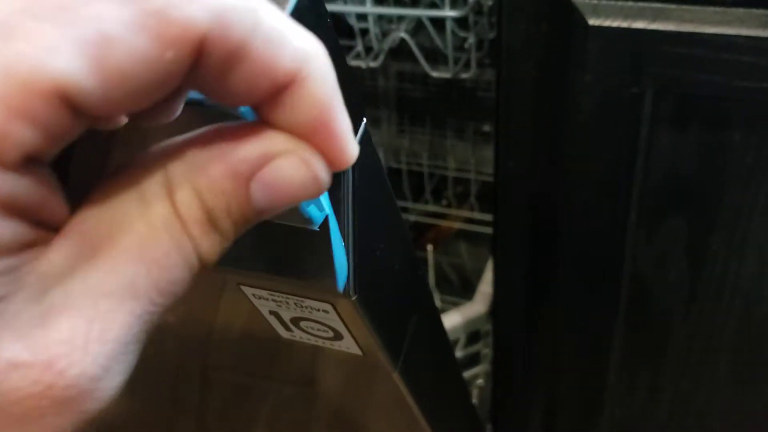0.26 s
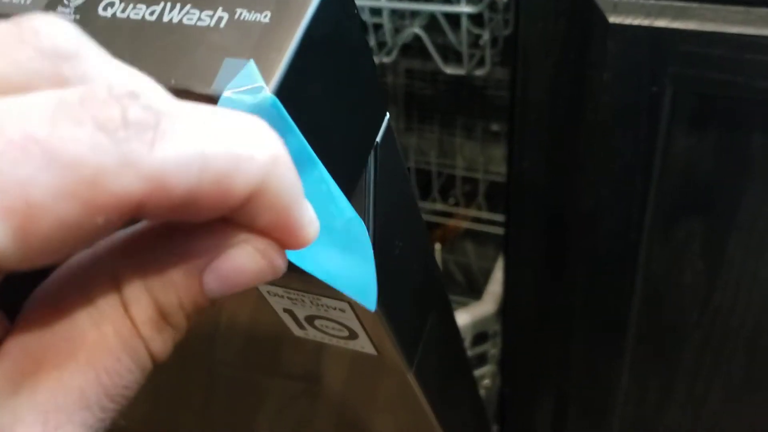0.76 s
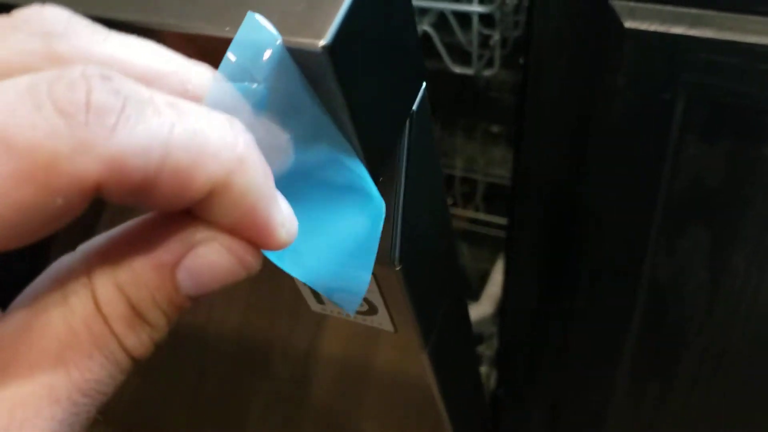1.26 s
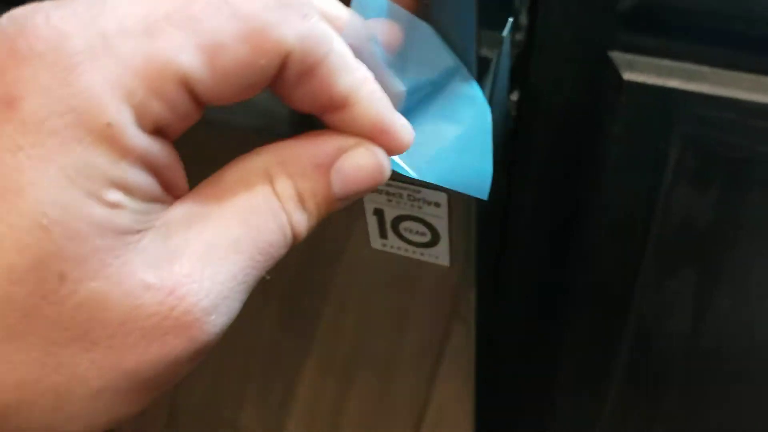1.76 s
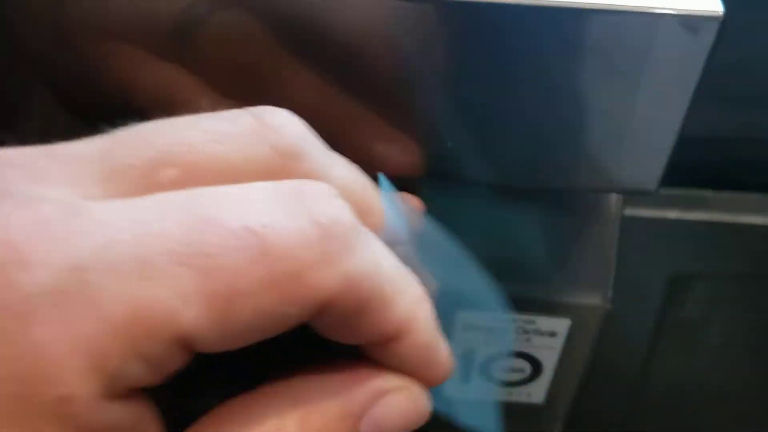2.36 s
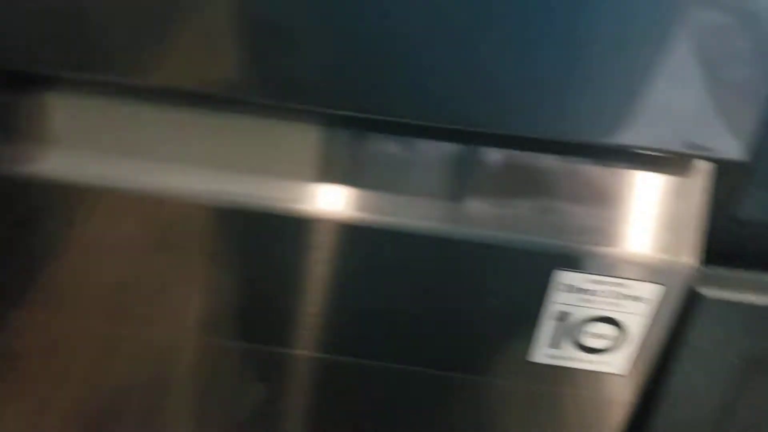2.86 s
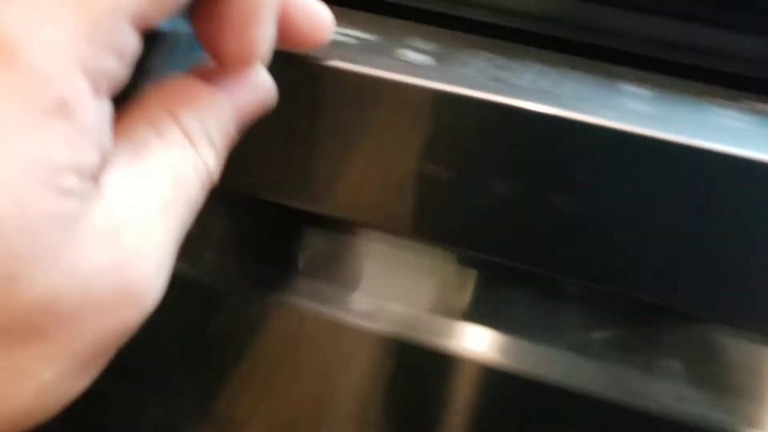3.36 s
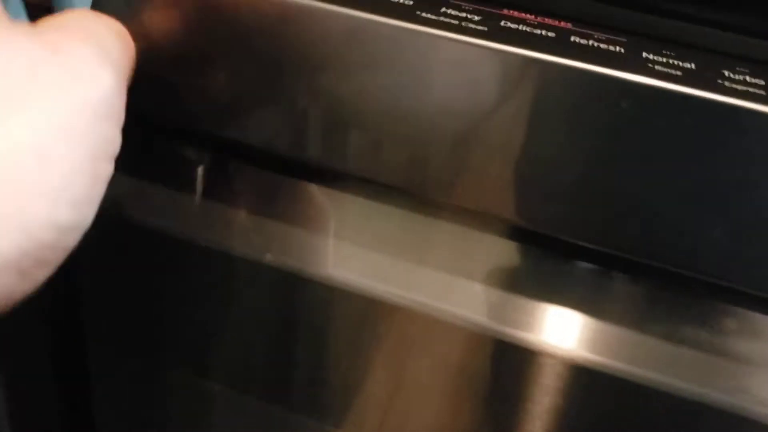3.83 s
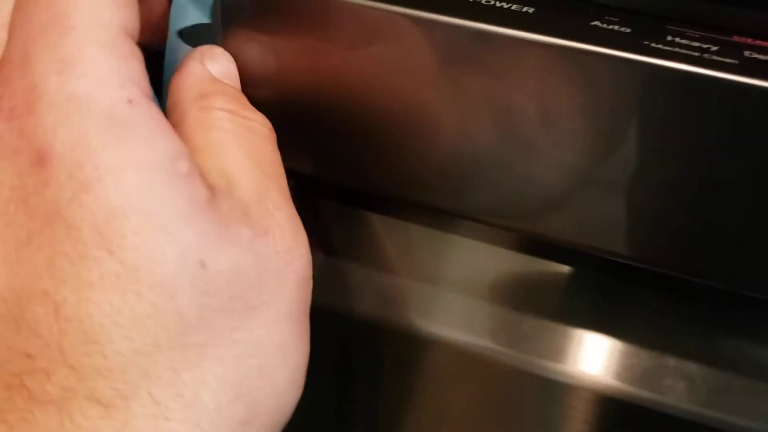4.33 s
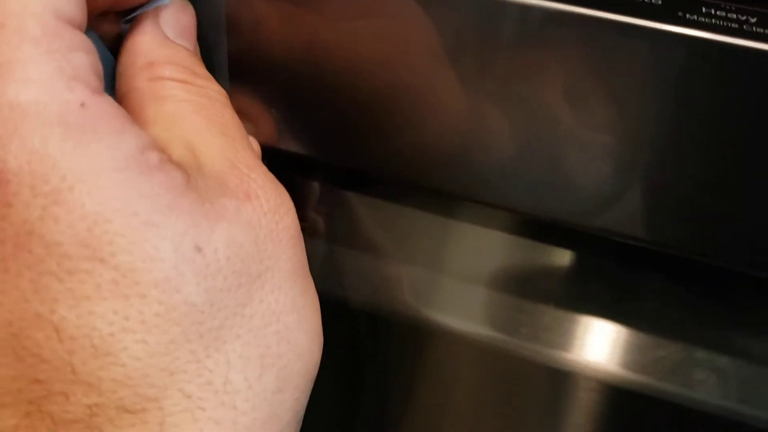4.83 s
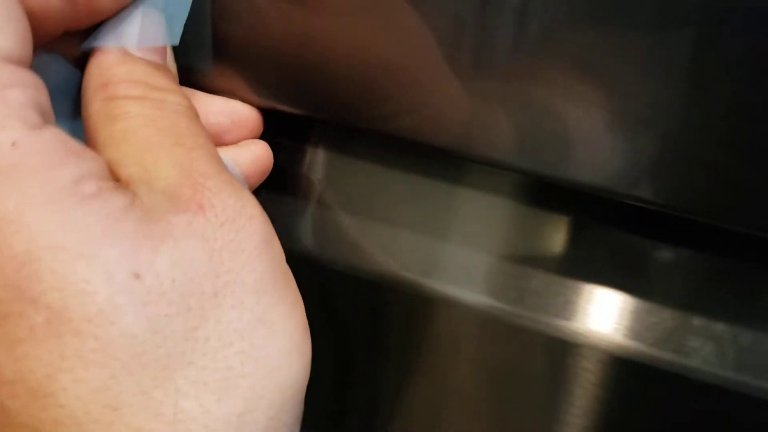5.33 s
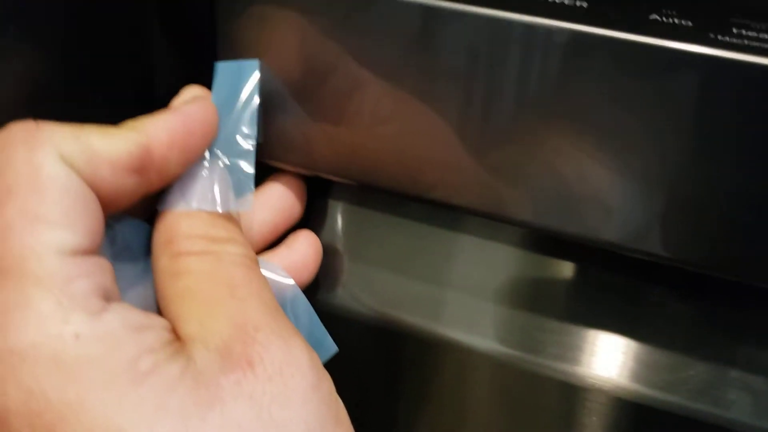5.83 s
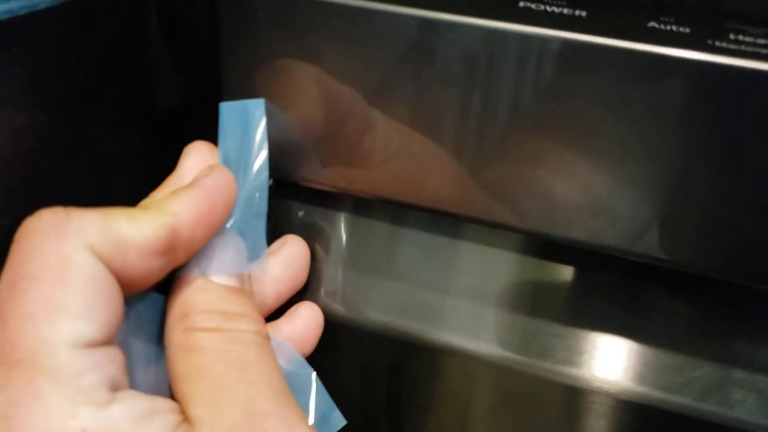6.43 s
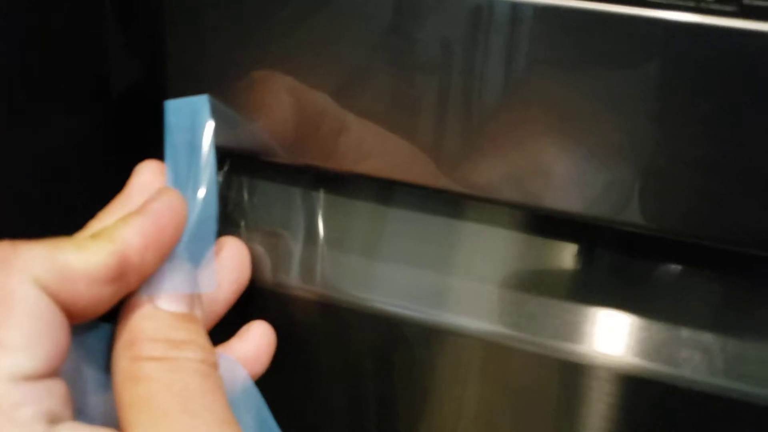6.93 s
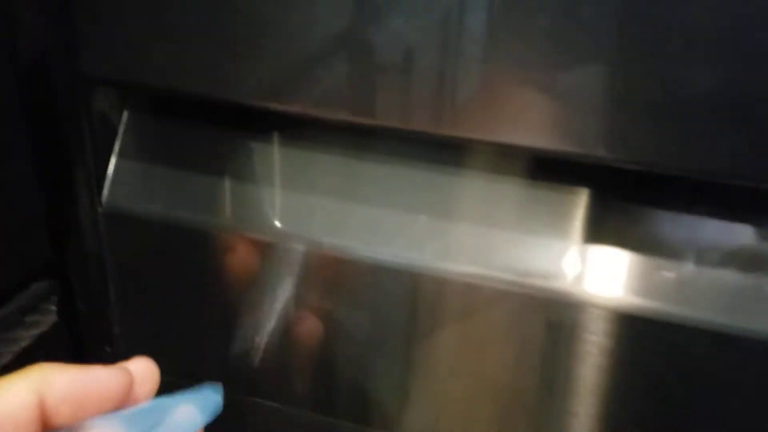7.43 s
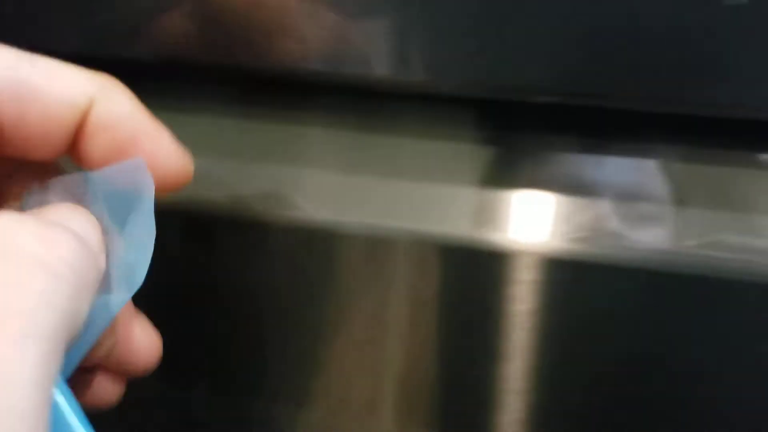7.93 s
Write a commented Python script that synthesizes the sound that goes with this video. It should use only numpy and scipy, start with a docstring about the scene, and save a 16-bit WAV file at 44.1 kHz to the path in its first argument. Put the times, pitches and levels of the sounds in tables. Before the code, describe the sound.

Protective plastic film is peeled by hand off a steel dishwasher door, very close to the microphone. Short tugs give sharp snaps and sticky crackles, with a couple of low air thumps early on. Scattered ticks lead to a busier run of snapping, a lull, then a longer crackling pull and a final burst of crinkling. The kitchen adds a short, bright echo and a faint hum.

```python
"""Peeling film off a steel door

Protective film is pulled off a dishwasher door by hand, a few centimetres from a phone.
Creases buckle with sharp snaps, the glue lets go in crackling runs and the door rings faintly under both.
The flicking film slaps and puffs air at the phone; a humming kitchen adds a short, bright echo."""
import sys
import numpy as np
from scipy import signal
from scipy.fft import rfft, irfft
from scipy.io import wavfile
from scipy.ndimage import uniform_filter1d

SR = 44100
rng = np.random.default_rng(int(sys.argv[2]) if len(sys.argv) > 2 else 0)


def persist_wave(psi):
    """Save psi, clipped to +-1, as 16-bit WAV."""
    counts = np.round(np.clip(psi, -1, 1) * 32767).astype(np.int16)
    wavfile.write(sys.argv[1], SR, np.atleast_2d(counts).T)


N = 361179
TIME = np.arange(N) / SR
SNAP_LEAD_S = .01  # a snap starts this long before its peak


# Creases in the loose film giving way: t/s, ring level/dB, ring f/Hz, crack level/dB
CREASES = [(0.2158, -59, 4500, -33), (0.4887, -46.5, 3500, -66), (0.51, -62, 3360, -43.5),
           (0.773, -58, 1710, -46.5), (0.8962, -48.5, 6500, -19), (1.202, -39.5, 5850, -37),
           (1.269, -75, 3700, -53), (2.066, -47, 4190, -49), (2.2096, -26.5, 4800, -30),
           (3.118, -47.5, 2920, -70.5), (3.3153, -41, 2760, -31.5), (3.4799, -55, 5700, -29),
           (3.5116, -22.5, 3740, -18.5), (3.543, -51, 4780, -28), (3.747, -44.5, 2060, -25),
           (3.817, -36.5, 4600, -36.5), (4.0392, -44.5, 5300, -46.5), (4.1099, -17.5, 5070, -55),
           (4.265, -42.5, 4400, -57.5), (4.361, -44, 4600, -52), (4.404, -32, 4300, -30),
           (4.6342, -42, 3830, -35), (4.7177, -36, 3900, -41), (4.7588, -37, 3930, -28),
           (4.779, -26.5, 3800, -30), (4.849, -31.5, 5120, -28.5), (4.9126, -48, 5750, -19),
           (5.3236, -51, 3790, -41), (5.54, -40, 3930, -42), (5.6007, -45.5, 5910, -41),
           (5.919, -58.5, 4460, -46.5), (6.2807, -49.5, 5540, -47), (6.355, -83, 4550, -46.5),
           (6.4947, -30.5, 2720, -23.5), (6.709, -34, 4830, -31), (7.1266, -25, 4370, -18),
           (7.148, -30.5, 4100, -36), (7.2035, -29, 6040, -22), (7.5087, -51.5, 6070, -27),
           (7.5416, -34, 3820, -26), (7.6442, -39, 5640, -51), (7.6755, -35, 5140, -47),
           (7.7846, -34.5, 3740, -31.5), (7.9079, -59, 5470, -47), (7.9948, -33.5, 4270, -42),
           (8.0099, -39, 1373, -23), (8.025, -24, 5500, -26), (8.0359, -31, 5500, -19),
           (8.044, -22.5, 3680, -19), (8.056, -18.5, 3620, -30), (8.0678, -25.5, 2010, -25),
           (8.08, -28.5, 2030, -19.5), (8.1125, -31, 1920, -20.5), (8.1341, -24, 4300, -19.5),
           (8.157, -40.5, 1910, -26), (8.175, -52, 5820, -31.5)]

def creases():
    """Each crease buckles with a very short snap that barely moves the door."""
    events = [(s, ring_db, hz, crack_db, max(ring_db, crack_db) - 36, .87)
              for s, ring_db, hz, crack_db in CREASES]
    return place_snaps(events, pan_db=-14, room_db=-13)


# Patches of glue tearing off the door: t/s, ring level/dB, ring f/Hz, crack level/dB, length/ms
RIPS = [(0.186, -64, 5500, -23, 0.98), (0.605, -44, 4250, -33.5, 0.16), (0.609, -46, 2000, -35.5, 7.5),
        (0.6295, -44, 2290, -38, 0.43), (0.8406, -33, 4200, -29, 3.5), (0.8712, -35.5, 2800, -22, 1),
        (1.008, -37, 5900, -19, 0.69), (1.016, -37, 4660, -21.5, 1.7), (1.023, -36, 3500, -21, 0.31),
        (1.0293, -20.5, 3720, -25, 36), (1.586, -49, 1300, -45.5, 5.2), (2.126, -49.5, 1510, -35.5, 0.9),
        (2.1932, -35.5, 3300, -24, 0.25), (2.36, -47.5, 2100, -60, 27), (2.765, -45.5, 3164, -64, 25),
        (3.2823, -42, 2826, -37, 4.4), (3.378, -34.5, 2900, -26.5, 0.53), (3.492, -34, 3720, -30.5, 5.3),
        (3.8391, -50, 3100, -32.5, 3.9), (3.8579, -40, 3950, -32.5, 0.55), (3.87, -38, 3800, -35.5, 9.7),
        (4.1414, -18.5, 5120, -25, 9.5), (4.3372, -34.5, 4600, -46, 0.3), (4.407, -20, 5270, -32, 1.35),
        (4.4851, -33, 5300, -26.5, 1.8), (4.5323, -58, 5750, -23.5, 0.52), (4.585, -33.5, 2950, -26.5, 11),
        (4.775, -31, 3930, -25.5, 0.45), (5.682, -29, 2700, -20.5, 1.06), (6.246, -39, 2880, -42, 4.9),
        (6.841, -44, 3290, -31.5, 0.2), (7.2091, -49, 3580, -17, 1.3), (7.2435, -30, 3440, -42, 0.42),
        (7.2606, -28.5, 1300, -22, 0.32), (7.2654, -25.5, 2760, -27.5, 7.6),
        (7.3294, -39.5, 2820, -42.5, .5), (7.3741, -39, 7180, -30, 0.96), (7.413, -39.5, 1690, -29, 0.89),
        (7.449, -34.5, 3420, -27.5, 5.5), (7.464, -48, 3700, -31.5, 0.36), (7.5868, -49, 2060, -31.5, 0.42),
        (7.7012, -34, 2180, -21, 3.5), (7.728, -24, 2520, -15.5, 10.5)]

def rips():
    """Each rip also taps the door. Steel yields little, so the tap grows more slowly than the rip."""
    events = [(s, ring_db, hz, crack_db, -32.5 + .57 * max(ring_db, crack_db), ms)
              for s, ring_db, hz, crack_db, ms in RIPS]
    return place_snaps(events, pan_db=-13, room_db=-12.5)


# Tone of a crack, mostly treble: f/Hz, level/dB
CRACK_TONE = [(200, -20.5), (900, -30.5), (2000, -14), (3500, -3.5), (5300, -0.5), (8500, -9.5),
              (10500, -10.5), (12500, -1), (15500, -5), (17000, -19)]

def snap(ring_db, ring_hz, crack_db, door_db, ms):
    """A burst of tiny breaks makes three stereo sounds: the film's ring, a crack and a tap on the door."""
    t = np.arange(int(.08 * SR)) / SR
    age_ms = 1000 * (t - SNAP_LEAD_S)
    # a long rip builds up as the glue stretches, then lets go
    burst = np.exp(np.minimum(age_ms / (.5 * ms), -age_ms / (.7 * ms ** .7)))
    # hand and door throw the burst back within a few milliseconds
    rebound = .43 * np.exp(-np.abs(age_ms) / 4.04) * (age_ms > 0)
    breaks = grains(len(t), per_s=20000, spread_db=1) * burst
    direct = np.array([breaks, np.roll(breaks, 8)])  # the right microphone hears it 8 samples later
    bounced = grains((2, len(t)), per_s=5000, spread_db=.53) * rebound
    push = direct + bounced
    ring = resonate(resonate(push, ring_hz, .32 * ring_hz), ring_hz, .7 * ring_hz)
    crack = colour(direct + .5 * bounced, CRACK_TONE)  # skin soaks up treble, so less comes back
    door = steel_door(push) + .15 * resonate(push, 1400, 870)
    parts = (ring_db, ring), (crack_db, crack), (door_db, door)
    # set each level as if all the energy fell within 10 ms
    return [undb(db) * x / np.sqrt(np.sum(x ** 2, axis=1, keepdims=True) / (SR / 100)) for db, x in parts]


# The left microphone faces away from the film and favours middle pitches: f/Hz, level/dB
LEFT_MIC_TONE = [(200, 10), (900, 10.5), (2000, 10.5), (4800, -3), (8000, -2), (15000, 6.5)]

def place_snaps(events, pan_db, room_db):
    """Snaps as heard at the phone and as sent into the room; pan_db turns the left side down."""
    near, sent = np.zeros((2, N)), np.zeros(N)
    for s, ring_db, ring_hz, crack_db, door_db, ms in events:
        ring, crack, door = snap(ring_db, ring_hz, crack_db, door_db, ms)
        left_db = pan_db + 5 * rng.standard_normal()  # each bit of film faces its own way
        add(near, (ring + crack + door) * sides(left_db, 0), s - SNAP_LEAD_S)
        # the ring of a small bit of film carries less far than the crack
        add(sent, (.5 * ring + crack + door)[1] * undb(room_db), s - SNAP_LEAD_S)
    return np.array([colour(near[0], LEFT_MIC_TONE), near[1]]), sent


# Tone of the crackling glue, also used for the sliding film: f/Hz, level/dB
CRACKLE_TONE = [(200, -7.5), (900, -17), (1900, -1.5), (2900, -5.5), (5200, -1.5), (8500, -13),
                (10500, -7.5), (12600, -1.5), (16000, -9)]

def peeling():
    """Threads of glue part in dense, uneven showers and drum on the door; the film adds sparse ticks."""
    glue_strength, door_strength = pull()
    slip_db = 2.9 * wobble(per_s=170) + 2.3 * wobble(per_s=35)  # the edge sticks and slips
    threads = grains((2, N), per_s=2300, spread_db=3) * undb(slip_db)
    flutter = rng.standard_normal((2, 300)) * np.exp(-TIME[:300] / .0009)
    clicks = grains((1, N), per_s=90, spread_db=2.2)
    ticks = unit(signal.oaconvolve(clicks, flutter, axes=1)[:, :N])
    crackle = unit(colour(threads + .65 * ticks, CRACKLE_TONE))
    drumming = unit(steel_door(threads + .21 * threads[::-1]))
    return crackle * glue_strength * sides(-1, 4) + drumming * door_strength * undb(-7)


# The last long pull that takes the strip off: t/s, crackle level/dB, door level/dB
LONG_PULL = [(6.89, -79.5, -80), (6.92, -55, -53.5), (7.11, -57.5, -66), (7.135, -44.5, -41.5),
             (7.2, -48, -56), (7.215, -34.5, -30.5), (7.28, -39, -29), (7.34, -45.5, -50.5),
             (7.44, -42, -37.5), (7.58, -38, -42.5), (7.68, -43, -48), (7.73, -47, -49.5),
             (7.98, -78, -58.5)]
# Short tugs that each peel a little film: t/s, length/s, crackle level/dB
TUGS = [(0, .06, -50), (0.197, .08, -34.5), (0.527, .1, -63.5), (0.799, 0.17, -55.5), (1.02, .15, -39.5),
        (1.429, .35, -60), (2.193, .1, -55), (2.307, .22, -55), (2.691, 0.086, -61), (3.479, .17, -52),
        (3.702, 0.18, -50.5), (4.537, .11, -41.5), (4.755, .17, -52), (5.668, .14, -48)]

def pull():
    """How strongly the hand's pull makes the glue crackle and the door drum, moment by moment."""
    glue, door = (undb(db) * gate(LONG_PULL) for db in curves(LONG_PULL))
    for s, length_s, db in TUGS:
        shape = tug(length_s, db)
        add(glue, undb(db) * shape, s)
        add(door, undb(-6 + .81 * db) * shape, s)
    return glue, door


def tug(length_s, db, slack_db=-73, let_go_s=.032):
    """A tug takes hold quickly and slackens: the harder it starts, the further it sinks."""
    t = TIME[:SR]
    taking_hold = 1 - np.exp(-t / (.034 * length_s))
    sinking = undb(-.7 * max(db - slack_db, 0) * t / length_s)
    letting_go = np.exp(-np.maximum(t - length_s, 0) / let_go_s)
    return taking_hold * sinking * letting_go


# The pitches at which the steel door rings: f/Hz, width/Hz, level/dB
DOOR_RINGS = [(202, 41, -5.5), (292, 33, 2.5), (413, 370, -9), (606, 26, 2.5), (867, 100, -3.5),
              (970, 15, 5), (1081, 210, -1.5), (1395, 150, -0.5), (1652, 27, 0.5)]

def steel_door(push):
    """Pushed by the film, the door rings at all its own pitches at once."""
    return sum((-1) ** k * undb(db) * resonate(push, hz, width)
               for k, (hz, width, db) in enumerate(DOOR_RINGS))


# Puffs of air as the tight film gives way: t/s, level/dB, fade time/ms
PUFFS = [(0.1859, -9.5, 13.8), (0.8724, -8, 6.5), (1.023, -31, 14), (3.747, -43, 31), (4.531, -24, 7.3),
         (4.771, -29.5, 6), (4.915, -26, 6.3), (8.024, -31, 12)]

def puffs(hz=64):
    """Each puff swings the nearer microphone through a couple of slow cycles: a low thump."""
    out, t = np.zeros(N), TIME[:SR // 4]
    swing = -np.cos(2 * np.pi * hz * t + .89)
    for s, db, ms in PUFFS:
        add(out, undb(db) * swing * np.exp(-t * 1000 / ms) * (1 - np.exp(-t / .000063)), s)
    return out * sides(-15, 0)


# The tight film flicking free: t/s, level/dB
FLICKS = [(0, -42), (0.189, -28.5), (0.872, -31.5), (1.014, -23.5), (3.49, -32), (4.777, -40)]
# Tone that turns a snap into a slap: f/Hz, level/dB
SLAP_TONE = [(1000, 6.5), (3200, -5.5), (5000, -3), (9000, 6.5), (13000, 8)]

def flicks():
    """The whole sheet throws each slap away from the phone, so it arrives by way of the room."""
    out = np.zeros(N)
    for s, db in FLICKS:
        ring, crack, _ = snap(db + .5, ring_hz=5200, crack_db=db, door_db=db, ms=9)
        add(out, (ring + crack)[1], s - SNAP_LEAD_S)
    return colour(out, SLAP_TONE)


def rustle():
    """Film sliding on film has no glue to catch on: a fine, smooth hiss that leaves the door still."""
    sway = undb(2 * wobble(per_s=25))  # swells and eases with the hand
    hiss = unit(colour(grains((2, N), per_s=9900, spread_db=2.4), CRACKLE_TONE))
    return hiss * sweep() * sway * sides(-1, 3)


# The freed film sweeping over itself: t/s, length/s, level/dB
SWEEPS = [(1.251, 0.23, -56.5), (1.411, 0.42, -56), (2.867, .38, -60.5), (3.262, .3, -50.5),
          (5.078, .4, -70.5), (5.931, .34, -57), (6.911, 0.19, -48.5), (7.987, 0.39, -33)]

def sweep():
    """How strongly the freed film slides over itself, moment by moment."""
    out = np.zeros(N)
    for s, length_s, db in SWEEPS:
        add(out, undb(db) * tug(length_s, db), s)
    return out


def loose_film(count=120, spread_db=13.5):
    """Small creases tick while the film moves, more often and louder the harder it is pulled."""
    out = np.zeros((2, N))
    motion = pull()[0] + sweep() + undb(-72.5)
    odds = np.cumsum(motion ** .4)
    for when, size, pitch in rng.random((count, 3)):
        at = np.searchsorted(odds, when * odds[-1])
        motion_db = 20 * np.log10(motion[at])
        db = -21.5 + .71 * motion_db + spread_db * size ** 2
        tick = sum(snap(db, ring_hz=2600 * 2 ** pitch, crack_db=db, door_db=db - 20.5, ms=1))
        add(out, tick, at / SR)
    return out * sides(-8, 0)


# Fingers bumping and sliding on the door: t/s, f/Hz, level/dB, fade time/ms
FINGER_BUMPS = [(0.534, 266, -56, 45), (0.635, 157, -48.5, 31), (.662, 237, -50, 21),
                (0.771, 363, -43.5, 11.4), (0.789, 96, -47, 96), (1.053, 260, -47, 67),
                (3.717, 153, -55, 110), (4.14, 213, -54.5, 74), (4.329, 137.6, -55.5, 100),
                (4.551, 195, -56.5, 140), (7.255, 286, -52, 37)]

def fingers():
    """Soft skin on steel: dull, short bursts of rubbing."""
    out, t = np.zeros(N), TIME[:SR // 3]
    for s, hz, db, ms in FINGER_BUMPS:
        noise = rng.standard_normal(len(t))
        rub = unit(resonate(resonate(noise, hz, 2 * hz), hz, 1.9 * hz))
        add(out, undb(db) * rub * np.exp(-t * 1000 / ms) * (1 - np.exp(-t / .005)), s)
    return out * sides(-1.5, 4.5)


# The path of one thin squeak: t/s, f/Hz, level/dB
SQUEAK = [(2.64, 1087, -87), (2.764, 1110, -76.5), (2.796, 1180, -73), (2.862, 1144, -74), (2.9, 1098, -89)]

def squeak():
    """A faint, nearly pure squeak that rises and falls."""
    hz, db = curves(SQUEAK)
    waver = 1 + .0053 * wobble(per_s=100)
    tone = unit(np.sin(2 * np.pi * np.cumsum(hz * waver) / SR))
    return tone * undb(db) * gate(SQUEAK) * sides(1, 3)


# Tone of the kitchen's echo: f/Hz, level/dB
ECHO_TONE = [(150, -21.5), (1200, 10), (2800, 6.5), (4500, -1.5), (8500, -3.5), (12000, -0.5), (16000, -7)]

def kitchen_echo(sound, near_s=.22, far_s=.7, far_db=-18):
    """Hard cabinets close by give a dense, bright echo; the rest of the room a fainter, longer one."""
    t = TIME[:SR * 3 // 4]
    fade = undb(-60 * t / near_s) + undb(far_db - 60 * t / far_s)
    onset = 1 - np.exp(-t / .00056)
    tail = colour(rng.standard_normal((2, len(t))) * fade * onset, ECHO_TONE)
    tail /= np.sqrt(np.sum(tail ** 2) / 2)
    return signal.oaconvolve(sound[None], tail, axes=1)[:, :N] * sides(-6, 0)


# How the kitchen's hum swells and fades: t/s, low note level/dB, base level of the upper notes/dB
HUM_LEVELS = [(0, -63.5, -117), (1.5, -65.5, -75.5), (3.2, -64.5, -78), (3.6, -56.5, -68.5),
              (7, -60.5, -70), (7.5, -64.5, -67.5), (8.19, -72.5, -74)]
# Tone of the kitchen's rumble: f/Hz, level/dB
RUMBLE_TONE = [(20, -28), (42, -10.5), (70, 2), (120, -9), (230, -7), (490, -15.5), (1000, -35.5),
               (3000, -47.5)]
# Tone of the faint hiss: f/Hz, level/dB
HISS_TONE = [(300, -15.5), (1070, -2.5), (1400, -11), (2290, 7.5), (3000, -16), (5200, -2.5), (8300, -27.5),
             (12000, -13.5), (16000, -20.5)]

def background():
    """Both microphones hear a low hum and rumble, and each has a faint hiss of its own."""
    low_db, high_db = curves(HUM_LEVELS)
    drifting_time = TIME + .0079 * np.cumsum(wobble(per_s=5)) / SR
    # a motor runs just under twice the mains frequency, so the two upper notes throb together
    notes = (53.8, low_db), (118.2, high_db + 4), (122, high_db - 15.5)
    hum = sum(undb(db) * unit(np.sin(2 * np.pi * hz * drifting_time)) for hz, db in notes)
    noise = rng.standard_normal(N) + .36 * rng.standard_normal((2, N))
    rumble = unit(colour(noise, RUMBLE_TONE)) * undb(-64.5 + .45 * (low_db + 61))
    hiss = unit(colour(rng.standard_normal((2, N)), HISS_TONE))
    return (hum + rumble) * sides(-1, 1) + hiss * sides(-71, -67)


def undb(db):
    """Turn decibels into a number to multiply by."""
    return 10 ** (np.asarray(db) / 20)


def sides(left_db, right_db):
    """Turn the left and right sides up or down."""
    return undb([[left_db], [right_db]])


def unit(x):
    """Scale a signal to an average strength (rms) of 1."""
    return x / np.sqrt(np.mean(x ** 2) + 1e-18)


def wobble(per_s):
    """A random wander that changes about per_s times a second."""
    return unit(uniform_filter1d(rng.standard_normal(N), SR // per_s))


def grains(shape, per_s, spread_db):
    """Tiny clicks at random moments, mostly weak and a few strong."""
    sizes = undb(spread_db * np.minimum(rng.exponential(size=shape), 4))
    return unit(rng.standard_normal(shape) * sizes * (rng.random(shape) < per_s / SR))


def curves(table):
    """The columns of a table, joined by straight lines in time."""
    s, *columns = np.transpose(table)
    return [np.interp(TIME, s, c) for c in columns]


def gate(table):
    """1 between a table's first and last time, 0 outside, with soft edges."""
    return uniform_filter1d(1. * ((TIME > table[0][0]) & (TIME < table[-1][0])), SR // 100)


def colour(x, points, size=2048):
    """Shape the tone of a sound along (f/Hz, level/dB) points."""
    hz, db = np.transpose(points)
    gain = undb(np.interp(np.log(np.arange(size // 2 + 1) * SR / size + 1), np.log(hz), db))
    # this fold makes the filter ring only after a click, never before it
    cepstrum = irfft(np.log(gain))
    cepstrum[1:size // 2] *= 2
    cepstrum[size // 2 + 1:] = 0
    response = irfft(np.exp(rfft(cepstrum)))
    return np.apply_along_axis(signal.oaconvolve, -1, x, response)[..., :x.shape[-1]]


def resonate(x, hz, width_hz):
    """Let through the pitches around hz; a narrower band rings longer."""
    return signal.lfilter(*signal.iirpeak(hz, max(hz / width_hz, 1), SR), x)


def add(track, sound, s):
    """Mix a sound into a track, starting at s seconds."""
    start = max(int(s * SR), 0)
    track[..., start:start + sound.shape[-1]] += sound[..., :max(N - start, 0)]


def scene():
    """Film, door and kitchen at the phone's two microphones."""
    creases_near, creases_sent = creases()
    rips_near, rips_sent = rips()
    peel = peeling()
    film = creases_near + rips_near + peel + rustle() + loose_film()
    echo = kitchen_echo(creases_sent + rips_sent + flicks() + undb(-13) * peel[1])
    return film + echo + puffs() + fingers() + squeak() + background()


def record(dry):
    """The phone clips the loudest peaks and cuts the treble above 15900 Hz."""
    treble_cut = signal.ellip(8, .2, 70, 15900, fs=SR, output="sos")
    return signal.sosfilt(treble_cut, np.clip(dry, -1, 1))


dry = scene()
out = record(dry)
persist_wave(out)
```